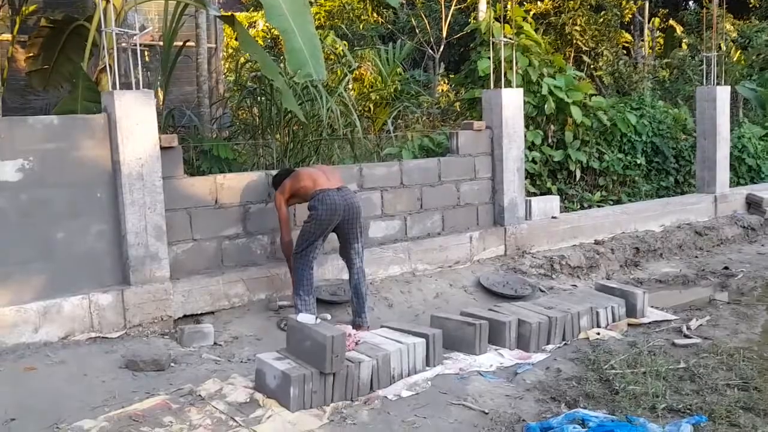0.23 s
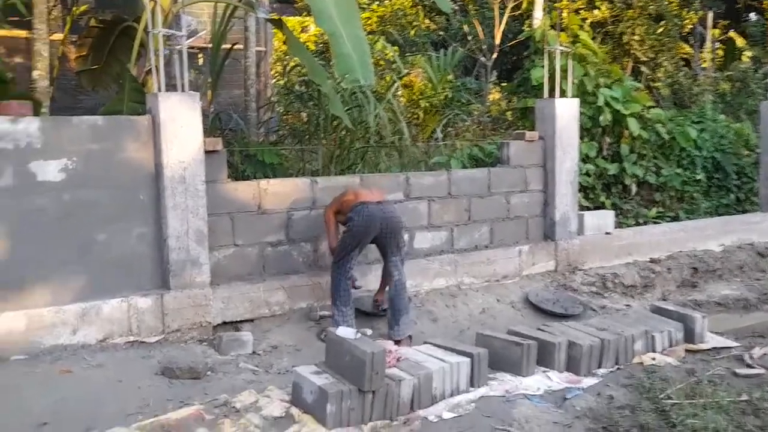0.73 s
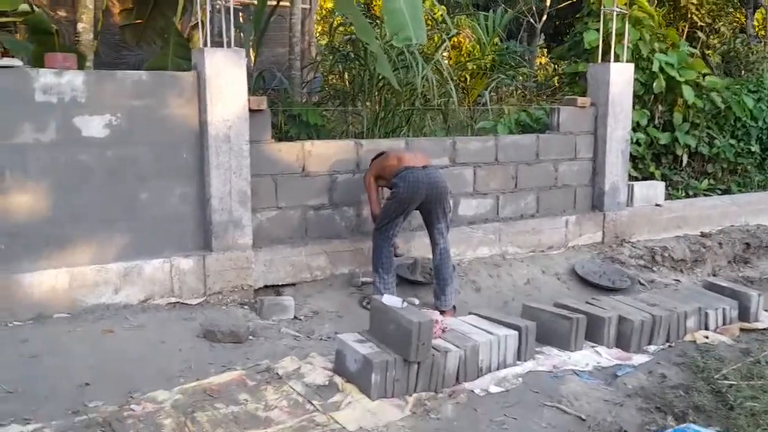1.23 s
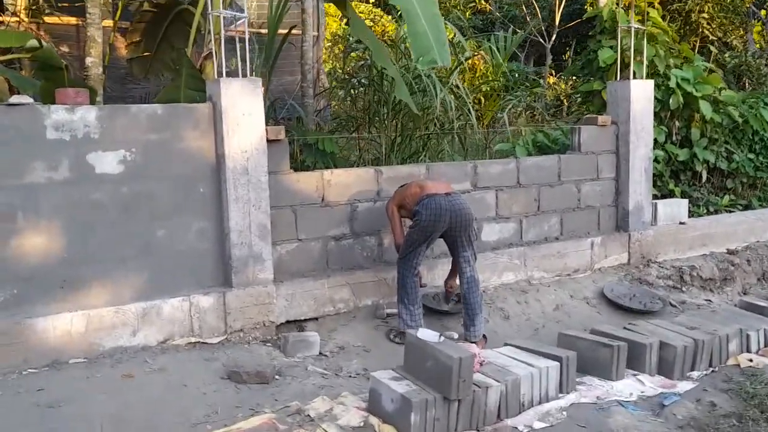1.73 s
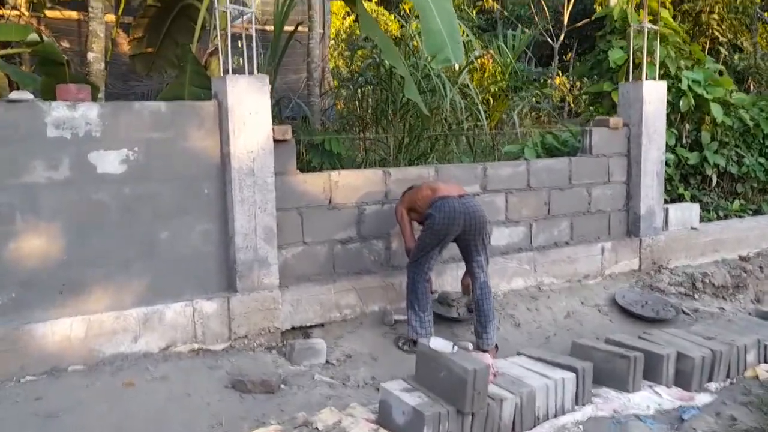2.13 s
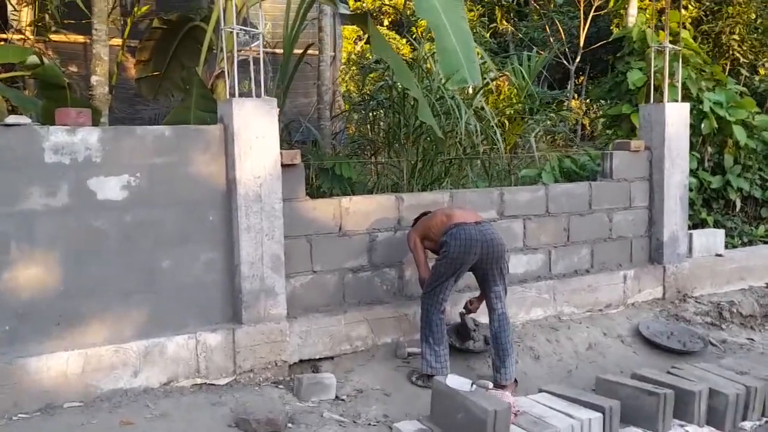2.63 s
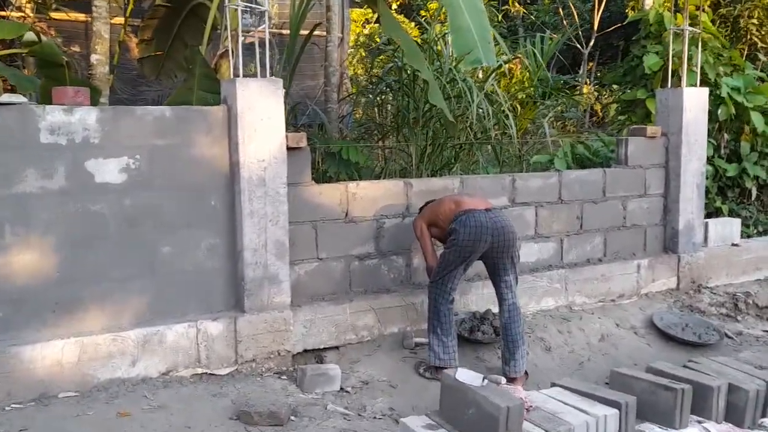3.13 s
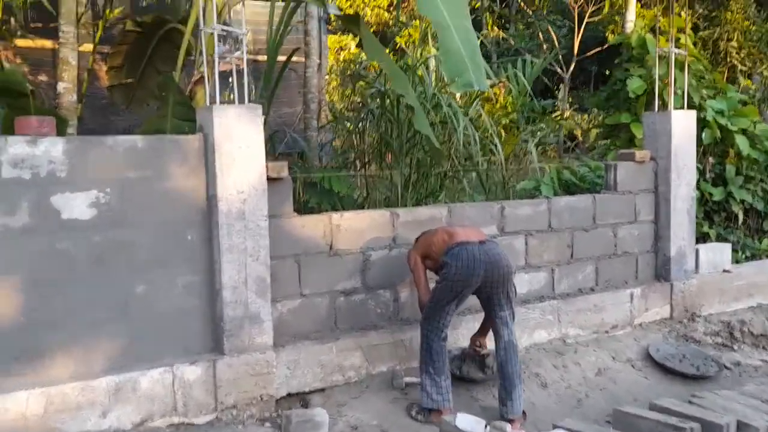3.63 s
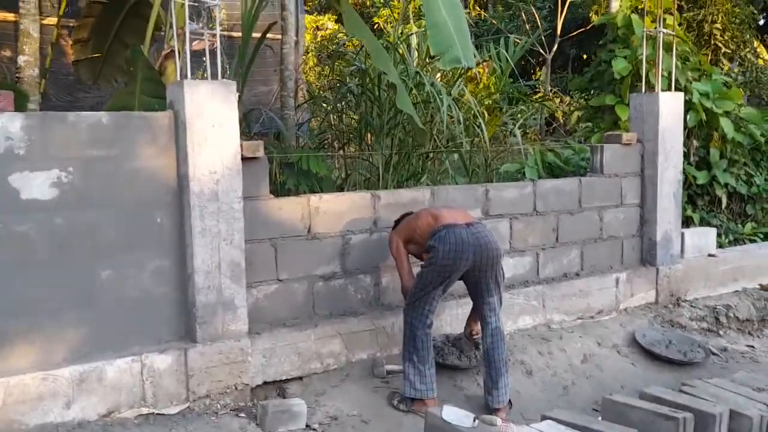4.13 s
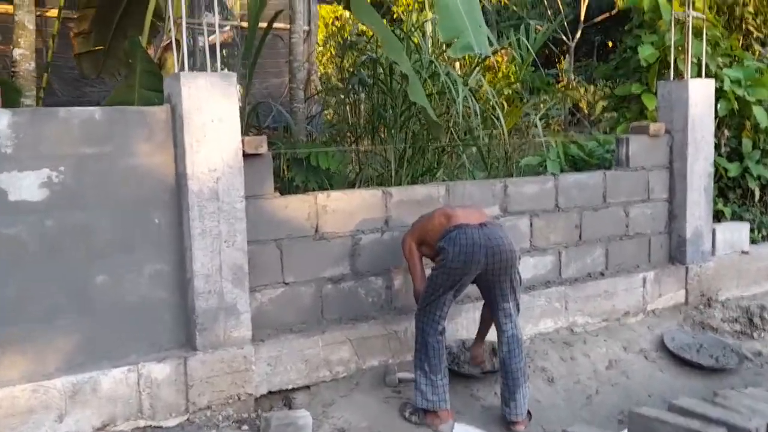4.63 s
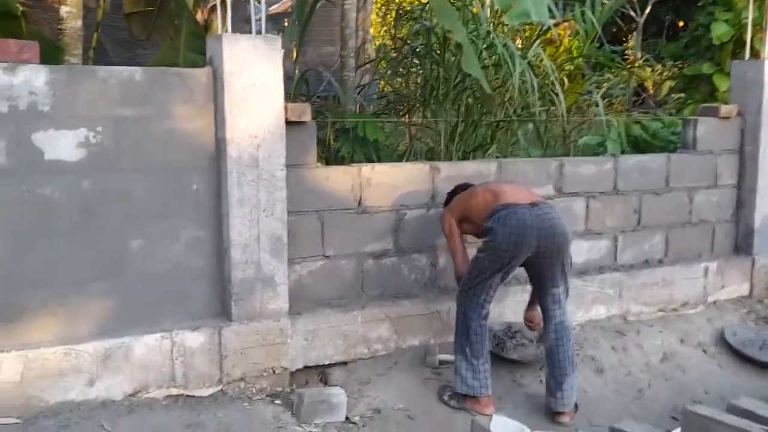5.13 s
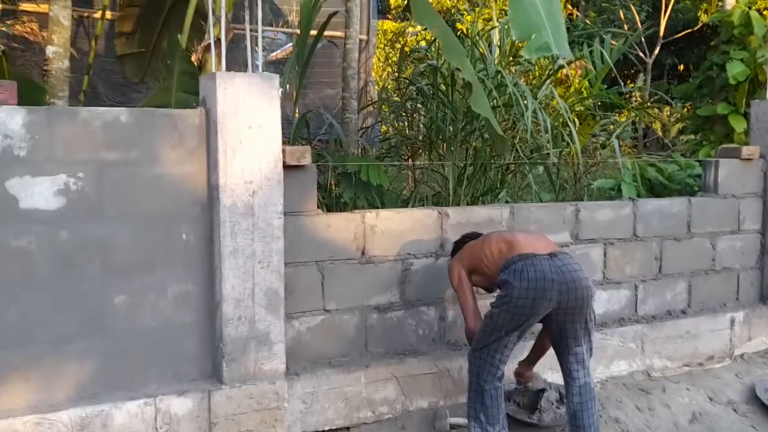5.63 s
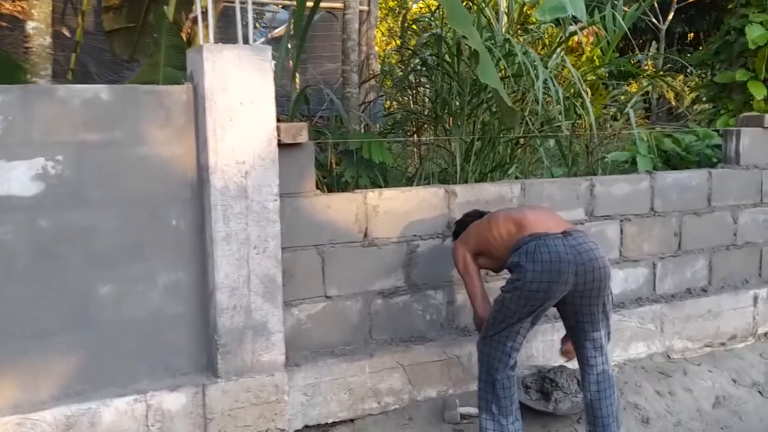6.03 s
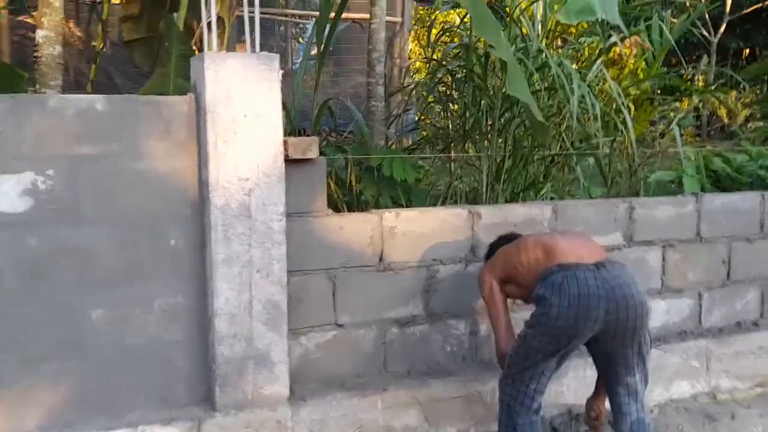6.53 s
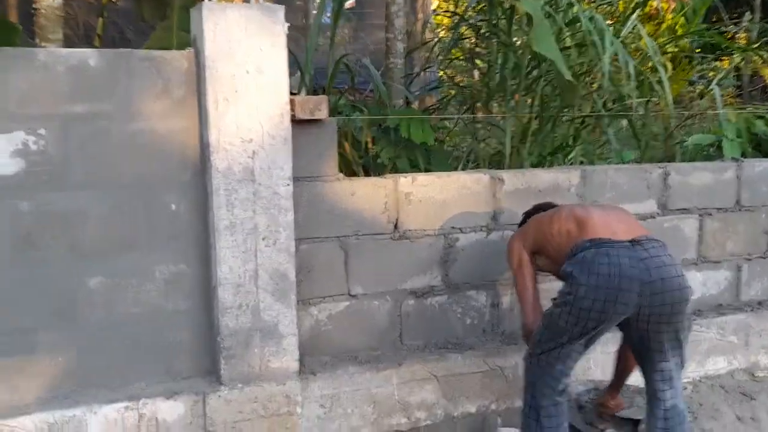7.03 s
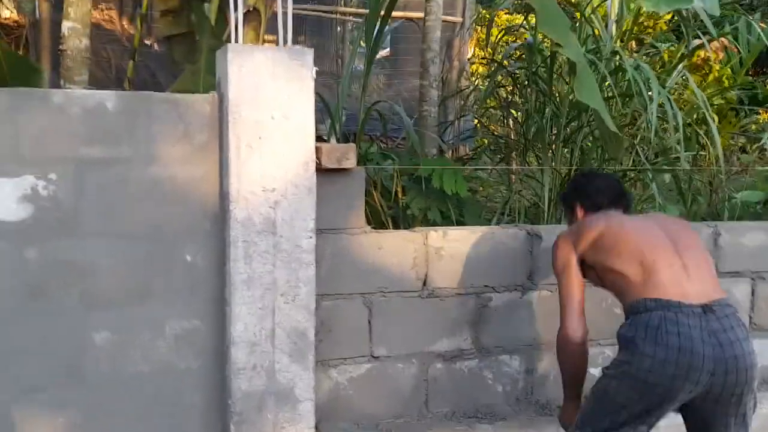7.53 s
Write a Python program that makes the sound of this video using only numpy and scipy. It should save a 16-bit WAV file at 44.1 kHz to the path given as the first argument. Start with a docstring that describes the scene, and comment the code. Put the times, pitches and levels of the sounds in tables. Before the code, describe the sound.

A steel trowel scrapes gritty mortar from a metal pan in short strokes, with sharp taps, while a bird repeats a whip-like two-note call outdoors.

```python
"""Beside a block wall a mason scoops mortar from a steel pan: filtered grainy noise drags and swells with a push, short noise
bursts tap, and wavering sines squeal, sinking in pitch; near the end the pan knocks hollowly twice (modes and noise bursts).
In the trees a bird repeats a two-note call of gliding tones, small birds chip briefly, and insects drone (a pulsed tone
over band noise). A dog howls far off in sliding harmonics; footfalls, rustles and cloth swishes are shaped noise
over a breeze."""
import sys
import numpy as np
from scipy import signal
from scipy.fft import rfft, irfft, next_fast_len
from scipy.io import wavfile

SR = 44100
rng = np.random.default_rng(int(sys.argv[2]) if len(sys.argv) > 2 else 0)


def unload_audio(sound):
    """Save the sound as a 16-bit wav file, at the path given as the first command line argument."""
    columns = np.transpose(np.atleast_2d(sound))
    # keep every value between -1 and 1, then stretch to whole-number steps
    steps = np.round(np.clip(columns, -1, 1) * 32767)
    wavfile.write(sys.argv[1], SR, steps.astype(np.int16))


N = 343142
T = np.arange(N) / SR
PADDED = next_fast_len(N + SR // 2, real=True)
FREQS = np.maximum(np.arange(PADDED // 2 + 1) * SR / PADDED, 1)
TOP_HZ = 16000
# modes of the steel trowel: nominal f/Hz, relative level/dB, t60/s
STEEL_MODES = [(789, -1, 0.066), (1305, 3, .07), (1505, -4, .07), (1960, -30, .07), (2598, 2.5, 0.057),
               (2940, -35, 0.047), (3900, -6.5, 0.055), (4670, 0, 0.06), (7550, 8, 0.049),
               (9450, -8.5, .07), (12900, -2, .05)]


def undb(db):
    """Decibels to gain."""
    return 10 ** (np.asarray(db) / 20)


def unit(x):
    """Scale to rms 1."""
    return x / np.sqrt(np.mean(x ** 2))


def band(x, lo_hz, hi_hz, order=2):
    """Butterworth band-pass."""
    sos = signal.butter(order, [lo_hz, min(hi_hz, .45 * SR)], "band", fs=SR, output="sos")
    return signal.sosfilt(sos, x)


def colour(x, points):
    """Shape a spectrum by (Hz, dB) points, interpolated over log frequency."""
    hz, db = np.transpose(points)
    gain = undb(np.interp(np.log(FREQS), np.log(hz), db))
    return irfft(rfft(x, PADDED) * gain, PADDED)[..., :N]


def split(x, edges_hz):
    """Overlapping bands that join without gaps, each scaled to rms 1."""
    below = [0] + [1 / (1 + (FREQS / hz) ** 8) for hz in edges_hz] + [1]
    spectrum = rfft(x, PADDED)
    return [unit(irfft(spectrum * (b - a), PADDED)[:, :N]) for a, b in zip(below, below[1:])]


def add(out, start_s, x):
    """Mix x in from a start time."""
    i = max(int(start_s * SR), 0)
    out[..., i:i + x.shape[-1]] += x[..., :max(N - i, 0)]


def walk(rate_hz, size=N):
    """Random wander, linear between random knots, of spread near 1."""
    at = np.arange(size) * rate_hz / SR
    knots = rng.standard_normal(size // 4 + 2)
    return 1.2 * np.interp(at, np.arange(len(knots)), knots)


def fade(t60_s, length_s):
    """Exponential decay."""
    return undb(-60 * T[:int(length_s * SR)] / t60_s)


def ring(modes, length_s, detune=0.0038):
    """Decaying modes of a struck object, each slightly detuned and of random sign on every blow."""
    t = T[:int(length_s * SR)]
    out = np.zeros(len(t))
    for hz, db, t60_s in modes:
        mode_hz = hz * (1 + detune * rng.standard_normal())
        out += undb(db) * fade(t60_s, length_s) * rng.choice([-1, 1]) * np.sin(2 * np.pi * mode_hz * t)
    return out


def wavering(hz, waver, rate_hz):
    """Phase of a tone whose pitch wanders a little."""
    return 2 * np.pi * np.cumsum(hz * (1 + waver * walk(rate_hz, len(hz)))) / SR


def stretch(rows, edge_s=0.00037):
    """Rows (s, ..) as sample curves: start time, soft-edged gate, columns."""
    s, *columns = np.transpose(rows)
    t = np.arange(s[0], s[-1], 1 / SR)
    gate = np.clip(np.minimum(t - s[0], s[-1] - t) / edge_s, 0, 1)
    return s[0], gate, [np.interp(t, s, c) for c in columns]


def glide(rows, waver=0, waver_rate_hz=30):
    """A gliding tone from rows (s, Hz, dB): start time, envelope, phase."""
    start, gate, (hz, db) = stretch(rows)
    return start, gate * undb(db) * np.sqrt(2), wavering(hz, waver, waver_rate_hz)


def echoes(x, t60_s, lo_hz, hi_hz, delay_s=0.014):
    """Diffuse reflections as decaying noise, different at each port."""
    tail = rng.standard_normal((2, SR)) * fade(t60_s, 1) * (T[:SR] > delay_s)
    tail /= np.sqrt(np.sum(tail ** 2, axis=1, keepdims=True))
    return signal.fftconvolve(x[None], band(tail, lo_hz, hi_hz, order=1), axes=1)[:, :N]


def grit_noise(grain_db, shared_below_hz):
    """Grainy noise at two ports, alike in the bass and unrelated in the treble."""
    # grain bursts are capped so that no single one sticks out
    sizes = np.minimum(rng.exponential(size=N // 16 + 1), 3)
    noise = rng.standard_normal((3, N)) * undb(grain_db * np.repeat(sizes, 16)[:N])
    alike = 0.73 / (1 + (FREQS / shared_below_hz) ** 2)
    spectra = rfft(noise, PADDED)
    return irfft(np.sqrt(alike) * spectra[0] + np.sqrt(1 - alike) * spectra[1:], PADDED)[:, :N]


def insects(level_db=-69.5, pulse_hz=61, depth=0.32, overtone_db=-15, pitch_hz=4000, chorus_db=-3):
    """One near insect pulses on a wavering pitch over a steady noise-band chorus with a weak overtone."""
    noise = rng.standard_normal((2, N))
    pulse = 1 + depth * np.sin(2 * np.pi * np.cumsum(pulse_hz * (1 + 0.018 * walk(3))) / SR)
    near = pulse * np.sin(2 * np.pi * np.cumsum(pitch_hz * (1 + .014 * walk(400))) / SR)
    chorus = undb(chorus_db) * unit(band(noise, 3830, 4200, order=3))
    overtone = undb(overtone_db) * unit(band(noise, 7300, 7800))
    return undb(level_db) * (near + chorus + overtone)


def air(rumble_trim_db=-1, hiss_trim_db=-4.5, leaf_trim_db=-2, crackle_db=2):
    """A flickering breeze on the microphone; each movement adds a swell of rustling clothes and sand."""
    # air spectrum: f/Hz, gain/dB
    air_points = [(25, -32), (55, -1), (130, -2), (300, -10), (750, -13), (1200, -20.5), (1650, -21),
                  (2200, -14.5), (3200, -24), (4500, -20), (6200, -28), (7800, -21), (11000, -28),
                  (13500, -26), (16000, -31)]
    # mason shifts and reaches: middle t/s, half length/s, then untrimmed levels: rumble/dB, rustle/dB, hiss/dB
    moves = [(0.247, 0.079, -62, -96, -77), (0.604, 0.066, -74, -63.5, -90), (1.207, 0.75, -89, -77, -75.5),
             (1.89, 0.23, -75, -78, -68.5), (2.755, 0.21, -70, -69, -65.5), (4.05, 1, -93, -73.5, -68),
             (4.704, 0.093, -58.5, -57, -70), (5.086, 0.31, -55, -58, -65.5),
             (5.618, 0.25, -64, -67.5, -66), (6.165, 0.12, -53.5, -58, -64.5), (6.554, 0.37, -76, -70, -72),
             (7.247, 0.13, -57, -67, -64)]
    breeze_db = [[-68.5], [-78.5], [-80]]  # rumble, rustle, hiss between movements, untrimmed
    power = undb(breeze_db) ** 2
    for s, half_s, *levels_db in moves:
        swell = np.exp(-((T - s) / half_s) ** 2 / 2)
        power = power + (undb(levels_db)[:, None] * swell) ** 2
    rumble, rustle, hiss = 10 * np.log10(power)
    parts = split(colour(grit_noise(crackle_db, 1200), air_points), (400, 2600, 6300))
    bands_db = rumble + rumble_trim_db, rustle, (rustle + hiss) / 2 + leaf_trim_db, hiss + hiss_trim_db
    together_db = walk(12)
    return sum(part * undb(db + together_db + 0.66 * walk(22)) for part, db in zip(parts, bands_db))


def howls(direct_db=-6.5, echo_db=-11, echo_t60_s=.45, octave_db=-30, twelfth_db=-28, answer_octave_db=-6,
          slide_semitones=4.2, sag_semitones_per_s=3, answer_sink_semitones_per_s=6.6,
          hoarse_waver=.07, hoarse_flutter_db=3.2):
    """Howls slide up, sag and drop; hoarse ones waver and flutter; distance leaves fundamental and tree echo."""
    # far howls: t/s, length/s, nominal f/Hz, untrimmed level/dB, slide time constant/s,
    # final drop/semitones, hoarseness (0-1)
    howl_rows = [(0, 0.066, 723, -54.5, 0.0024, 0.59, 0.72), (0.225, 0.39, 736, -57.5, .08, 3.36, 0.92),
                 (0.872, 0.37, 732.5, -54, 0.067, 3.1, 0.63), (1.331, 0.1, 748, -52.5, .025, 1.3, 0.6),
                 (1.606, 0.27, 723, -50.5, 0.026, 2.48, .35), (2.104, 0.053, 748, -54, 0.0036, .1, 0.07),
                 (2.221, 0.49, 760, -53.5, 0.0024, 4, .15), (2.717, .14, 502.7, -53, .003, .3, .3),
                 (2.899, 0.16, 467, -58, 0.0024, 4.2, 0.53), (3.07, .51, 735, -53.5, .006, 1.08, 0.18),
                 (3.838, 0.47, 713.4, -51, 0.0212, 0.14, 0.13), (4.602, .46, 692, -49.5, .03, .6, .08),
                 (7.398, 0.073, 615, -55.5, 0.0093, .1, 0.2), (7.627, 0.062, 672, -60, 0.0052, .3, 0.54),
                 (7.739, 0.043, 640, -61, .005, .3, 0.64)]
    # faint higher answers: t/s, length/s, nominal starting f/Hz, untrimmed level/dB
    answer_rows = [(1.083, 0.36, 1290, -68), (1.871, 0.2, 1030, -63), (2.84, 0.25, 1230, -81)]
    near, far = np.zeros((2, N))
    for s, length_s, hz, db, slide_s, drop, hoarse in howl_rows:
        t = T[:int(length_s * SR)]
        semitones = -slide_semitones * np.exp(-t / slide_s) - sag_semitones_per_s * t
        semitones -= drop * (t / length_s) ** 5
        phase = wavering(hz * 2 ** (semitones / 12), hoarse * hoarse_waver, 280)
        swell = signal.windows.tukey(len(t), .12)
        voice = np.sin(phase) + undb(octave_db) * np.sin(2 * phase) + undb(twelfth_db) * np.sin(3 * phase)
        flutter_db = hoarse * hoarse_flutter_db * walk(50, len(t))
        add(near, s, swell * undb(db + flutter_db) * voice)
    for s, length_s, hz, db in answer_rows:
        t = T[:int(length_s * SR)]
        phase = wavering(hz * 2 ** (-answer_sink_semitones_per_s * t / 12), .05, 300)
        voice = np.sin(phase) + undb(answer_octave_db) * np.sin(2 * phase)
        add(far, s, np.hanning(len(t)) * undb(db) * voice)
    echo = echoes(undb(echo_db) * near + far, echo_t60_s, 200, 2700)
    return np.sqrt(2) * (undb(direct_db) * near + echo)


def steps(t60_s=0.088, scuff_db=-14):
    """Dull footfalls on sandy ground: decaying low noise with a weak scuff."""
    # footfalls: t/s, peak level/dB
    footfalls = [(0.212, -64), (0.265, -47), (3.694, -49), (4.596, -44), (5.744, -45), (6.159, -51),
                 (7.468, -40)]
    out = np.zeros(N)
    for s, db in footfalls:
        env = fade(t60_s, .25)
        noise = rng.standard_normal(len(env)) * env
        thud = band(noise, 74, 335) + undb(scuff_db) * band(noise, 230, 810)
        add(out, s, undb(db) * thud / np.abs(thud).max())
    return out


def taps(ring_db=-16, trim_db=-1, low_trim_db=-2):
    """The edge meets the pan: a gritty crack and a ring damped by wet mortar."""
    # taps of the steel edge and snapping grit: t/s, untrimmed high-band peak/dB,
    # untrimmed low part relative/dB, crack t60/s
    tap_rows = [(0.269, -58, -3, 0.06), (0.6595, -49, -13, 0.017), (1.4865, -38.5, -7, .02),
                (1.638, -33, -13, .03), (2.3304, -43, 8.5, .02), (3.271, -45, -30, .02),
                (3.471, -22, -6, 0.073), (4.6683, -36, -11.5, 0.018), (4.682, -26, -12, 0.023),
                (4.9288, -29.5, -24.5, .006), (5.3582, -19.5, -25, 0.03), (5.376, -23.5, -12, 0.015),
                (5.4705, -40, -17, .02), (5.542, -25, -5.5, 0.05), (6.797, -25, -8, 0.02),
                (6.8704, -19.5, -1.5, 0.012), (7.113, -42.5, 4, 0.022), (7.479, -38, -15, 0.017)]
    out = np.zeros((2, N))
    for s, db, low_rel_db, t60_s in tap_rows:
        crack = fade(t60_s, .15)
        ringing = ring(STEEL_MODES, .15) * fade(6 * t60_s, .15)
        hit = crack * rng.standard_normal((2, len(crack))) + undb(ring_db) * ringing
        high, low = unit(band(hit, 1650, 9100)), unit(band(hit[0], 460, 1770))
        mix = high + undb(low_rel_db + low_trim_db) * low
        add(out, s, mix / np.abs(high).max() * undb(db + trim_db))
    return out


def rippled(x, ripple_db=3.8, spacing_hz=110):
    """The pan's many small, close resonances; their pattern changes as the contact point travels."""
    hz = np.arange(500, TOP_HZ, spacing_hz)

    def pattern():
        ripple = ripple_db * rng.standard_normal(len(hz)) * (hz > hz[0])  # flat below the first point
        return colour(x, np.column_stack([hz, ripple]))

    here, there = pattern(), pattern()
    travel = np.clip(.5 + walk(14), 0, 1)
    return travel * here + (1 - travel) * there


def scrapes(grain_db=2.5, body_trim_db=-2, scrape_trim_db=-1.5, hiss_trim_db=-1,
            judder_db=1.7, steel_db=-2, shift_db=5, sharpness=0.0034):
    """Sand cracks under the edge, bunched by stick-slip; a push swells the stroke, the load darkens it."""
    # scrape spectrum: f/Hz, gain/dB
    scrape_points = [(88, -74), (150, -22.5), (264, -9), (431, -16), (662, 1.5), (960, -4.5), (1420, -8.5),
                     (1690, -11), (2500, -11), (4000, -6.5), (6510, -13), (7470, -13.5), (10800, -14),
                     (13200, -9), (16000, -21)]
    # trowel strokes: t/s, drag length/s, untrimmed drag level/dB, push delay/s, push half length/s,
    # full push gain/dB, untrimmed fine hiss relative/dB, untrimmed pan body relative/dB
    scoops = [(0.659, 0.19, -43.5, 0.067, 0.036, 12, 1, -6.5),
              (1.484, 0.17, -45.5, 0.048, 0.028, 13, -2.5, -12),
              (2.326, 0.15, -36.5, 0.079, 0.034, 8, 2.5, -10.5),
              (3.266, 0.2, -39, 0.061, 0.029, 7, -2, -12), (4.665, 0.17, -46.5, 0.09, 0.072, 16, 3.5, -6.5),
              (5.3546, 0.089, -36, 0.061, 0.037, 6.5, 3.5, -9),
              (5.47, 0.024, -39, 0.044, 0.0068, 9, 5.5, -8), (6.759, 0.052, -50, 0.039, 0.01, 13, 2, -9.5),
              (6.866, 0.05, -47.5, 0.059, 0.02, 7.5, 5.5, 4)]
    push_share_body, push_share_hiss = 0.5, 0.52
    load_body_db_per_s, load_hiss_db_per_s = 35.5, -31.5  # mortar piles on the blade
    bite_s, lift_t60_s = 0.0015, 0.18  # the edge bites at once; loose sand runs on after it lifts
    judder = undb(judder_db * np.clip(walk(170), -2, 2))
    grit = rippled(colour(grit_noise(grain_db, 2200) * judder, scrape_points))
    # the moving contact favours one steel mode, then another
    steel = 0
    for hz, _, _ in STEEL_MODES:
        favour_db = steel_db + shift_db * np.clip(walk(45), -2, 2)
        steel = steel + undb(favour_db) * band(grit, (1 - sharpness) * hz, (1 + sharpness) * hz, order=1)
    grit = grit + steel
    gains, t = np.zeros((3, N)), T[:SR // 2]
    for s, length_s, drag_db, push_s, half_s, push_db, hiss_rel_db, body_rel_db in scoops:
        contact = np.minimum(t / bite_s, 1) * undb(-60 * np.maximum(t - length_s, 0) / lift_t60_s)
        push = push_db / (1 + ((t - push_s) / half_s) ** 6)
        body = body_trim_db + body_rel_db + push_share_body * push + load_body_db_per_s * t
        hiss = hiss_trim_db + hiss_rel_db + push_share_hiss * push + load_hiss_db_per_s * t
        add(gains, s, contact * undb(drag_db) * undb([body, scrape_trim_db + push, hiss]))
    return sum(gain * part for gain, part in zip(gains, split(grit, (1750, 6300))))


def blade(rough=0.47, waver=0.026, trim_db=-2, sink_hz_per_s=4000):
    """Friction makes the blade ring unsteadily for a moment while the load pulls its pitch down."""
    # squeals: loudest t/s, nominal f/Hz then, untrimmed level/dB, swell and fade time constant/s
    squeals = [(0.715, 1410, -36, .008), (0.73, 1440, -29.5, 0.0078), (.84, 794, -61, 0.014),
               (1.543, 1344, -39.5, 0.016), (2.337, 3100, -42, 0.007), (2.385, 3000, -33.5, .02),
               (2.385, 1341, -33, 0.015), (2.46, 761, -41, 0.021), (3.29, 1955, -36, 0.00725),
               (3.337, 1220, -30.5, 0.0057), (4.73, 1547, -36, .016), (4.788, 1203, -36.5, .014),
               (5.361, 2750, -31, 0.0022), (5.391, 3320, -32.5, .012), (5.402, 7600, -24.5, 0.014)]
    out = np.zeros(N)
    for s, hz, db, swell_s in squeals:
        t = np.arange(-3 * swell_s, 3 * swell_s, 1 / SR)
        env = undb(db) * np.exp(-np.abs(t) / swell_s) * signal.windows.tukey(len(t))
        phase = wavering(hz - sink_hz_per_s * t, waver, 387)
        in_phase = (1.12 + rough * walk(220, len(t))) * np.sin(phase)
        quadrature = rough * walk(234, len(t)) * np.cos(phase)
        add(out, s + t[0], env * (in_phase + quadrature))
    return out * np.sqrt(2) * undb(trim_db)


def twitter(level_db=-61, count=16):
    """Small birds deep in the trees chip for a moment: falling chirps heard only as echoes."""
    out = np.zeros(N)
    for s in np.linspace(.99, 1.42, count) + 0.0032 * rng.standard_normal(count):
        start, env, phase = glide([(0, 5150, -20), (.008, 4815, -2.5), (.02, 4200, 6.5)], 0.049, 75)
        add(out, s + start, env * np.sin(phase))
    return undb(level_db) * echoes(out, 0.32, 2000, 9000)


def swishes(edge_db=-4):
    """Cloth slides over cloth near the microphone with a soft, very high hiss."""
    # swishes: middle t/s, level/dB of the upper band, half length/s
    swish_rows = [(1.245, -63.5, 0.03), (2.896, -71, 0.044), (5.685, -69, 0.017), (5.959, -60, 0.026),
                  (6.278, -63.5, 0.095), (6.512, -65.5, 0.047)]
    env = sum(undb(db) * np.exp(-((T - s) / half_s) ** 2) for s, db, half_s in swish_rows)
    noise = rng.standard_normal((2, N))
    return env * (unit(band(noise, 12400, 14800)) + undb(edge_db) * unit(band(noise, 6500, 9000)))


def bird(direct_db=-9.5, twigs_db=-8, leaves_db=-5.5, twigs_t60_s=.06, forest_db=-11,
         side_db=.5, arch_db=-8.5, arch_scatter_db=-4):
    """A whip-like falling note and a soft arch, never twice quite the same; twigs and leaves blur both."""
    # calls: t/s, untrimmed falling note level/dB, untrimmed arched note level/dB
    calls = [(1.461, -35, -58), (1.778, -32.5, -42.5), (2.087, -35.5, -44), (2.701, -36, -43.5),
             (3.036, -38, -42.5), (3.681, -35, -41.5), (4.007, -35, -41), (4.352, -36, -41.5),
             (5.047, -34, -42), (5.731, -34, -45.5), (6.1, -37, -43.5), (6.474, -37.5, -46),
             (6.845, -36.5, -45.5)]
    # falling note: t/s from the call, nominal f/Hz, relative level/dB
    fall_rows = [(-.010, 5750, -26), (-.007, 5400, -12), (-.004, 5050, -4), (0, 4600, -2), (.006, 3950, -5),
                 (.015, 2850, -21)]
    # arched note: t/s from the call, nominal f/Hz, relative level/dB
    arch_rows = [(.06, 2080, -18), (.072, 2350, -6), (.081, 2750, -2), (.089, 2940, -1), (.1, 2600, -3),
                 (.11, 2300, -15)]
    fall, arch = np.zeros((2, N))
    for s, *levels_db in calls:
        for out, note, db in zip((fall, arch), (fall_rows, arch_rows), levels_db):
            start, env, phase = glide(note, .025, 250)
            pitch = 1 + .018 * rng.standard_normal()
            flutter_db = 1.5 * walk(120, len(env))
            add(out, s + start, undb(db + flutter_db) * env * np.sin(pitch * phase))
    call = fall + undb(arch_scatter_db) * arch
    near = undb(direct_db) * fall + undb(arch_db) * arch
    near = near + undb(twigs_db) * echoes(call, twigs_t60_s, 1400, 15000, delay_s=0)
    far = undb(leaves_db) * echoes(call, 0.22, 2000, 10000, delay_s=.012)
    far = far + undb(forest_db) * echoes(call, 1.1, 3300, 6100, delay_s=0.044)
    return near * undb(np.array([[-side_db], [side_db]])) + far


def knocks(flex_trim_db=-3, ring_db=-14, clack_t60_s=0.034, clack_trim_db=-1, sand_t60_s=0.57, swell_s=0.0074):
    """The thin pan bottom flexes with a boom and rings on; the rim chatters, and sand slides inside."""
    # hollow knocks: t/s, then untrimmed levels: boom/dB, clack/dB, sliding sand/dB
    knock_rows = [(6.841, -23.5, -31, -65), (7.1503, -22, -25, -54.5)]
    # flexing pan bottom, stiffer the further it bends: t/s after the knock, f/Hz, relative level/dB
    flex_rows = [(0, 143.4, -9), (.009, 152, -6), (.02, 213, -3.5), (.03, 186, 0.5), (.04, 115, -11),
                 (.047, 124, -41)]
    # pan modes: nominal f/Hz, relative level/dB, t60/s
    pan_modes = [(123.2, 6, 0.51), (160.5, -1, 0.51), (196.4, 6.5, 0.25), (271.5, 1, 0.283),
                 (305, -8, 0.44), (549, 0.5, 0.13), (605, 7, 0.056), (723, 1.5, 0.2), (844, 0, 0.085),
                 (986, -31, 0.13), (1200, -17, 0.089), (1450, -9.5, 0.28), (1920, -21, 0.4)]
    # rim chatter on the ground: t/s after the knock, relative level/dB
    chatter_rows = [(0, -2), (.014, -2.5), (.023, -1.5), (.038, -8.5)]
    out = np.zeros(N)
    t = T[:int(.6 * SR)]
    for s, boom_db, hit_db, sand_db in knock_rows:
        _, env, phase = glide(flex_rows)
        add(out, s, undb(boom_db + flex_trim_db) * env * np.sin(phase))
        ringing = ring(pan_modes, 0.53)
        add(out, s, undb(boom_db + ring_db) * ringing * np.minimum(T[:len(ringing)] / swell_s, 1))
        for delay_s, db in chatter_rows:
            clack = fade(clack_t60_s, .15)
            noise = unit(band(rng.standard_normal(len(clack)), 300, 1120))
            add(out, s + delay_s, undb(hit_db + db + clack_trim_db) * clack * noise)
        slide = np.minimum(undb(-60 * (t - .12) / sand_t60_s), 1) * np.minimum(t / 0.039, 1)
        add(out, s, undb(sand_db) * slide * unit(band(rng.standard_normal(len(t)), 1560, 2140)))
    return band(out, 80, 11000, order=3)


def scene(wall_db=-12, yard_db=-20, knock_yard_db=-12, ring_yard_db=-8, yard_top_hz=7500):
    """Mix all sources; the block wall answers the trowel soon, the yard adds a thin, duller tail."""
    grit, ringing, pan = scrapes() + taps(), blade(), knocks()
    trowel = grit + ringing
    wall = undb(wall_db) * echoes(trowel[0], 0.14, 400, 11000)
    # the blade's ring is weaker than the grit in the yard's tail
    to_yard = grit[1] + undb(ring_yard_db) * ringing
    yard = undb(yard_db) * echoes(to_yard, 1.0, 400, yard_top_hz, delay_s=.027)
    yard = yard + undb(knock_yard_db) * echoes(pan, 0.66, 100, 4000, delay_s=0.023)
    work = trowel + wall + yard + pan + steps() + swishes()
    return work + bird() + howls() + twitter() + insects() + air()


def record(dry):
    """The two ports differ in colour and the sound reaches the right one first; the top is cut steeply."""
    # right port's lead over the left: f/Hz, level/dB
    port_tilt = [(60, 2.5), (700, 2.5), (1300, 4), (2400, 3), (4400, 0.5), (8100, 4.5), (15000, 5.5)]
    left, right = (colour(x, [(hz, side * db / 2) for hz, db in port_tilt]) for x, side in zip(dry, (-1, 1)))
    ports = np.array([np.pad(left, (2, 0))[:N], right])  # left lags by 2 samples
    return signal.sosfilt(signal.ellip(10, .2, 80, TOP_HZ, fs=SR, output="sos"), ports)


dry = scene()
out = record(dry)
unload_audio(out)
```